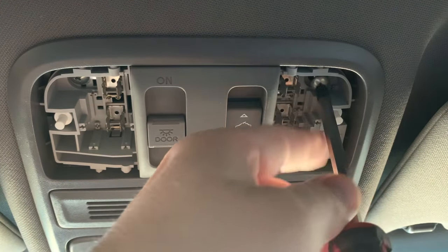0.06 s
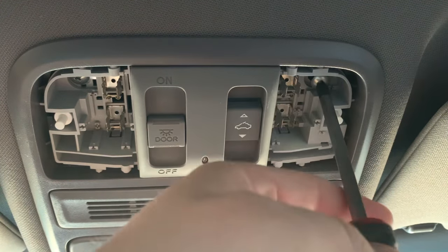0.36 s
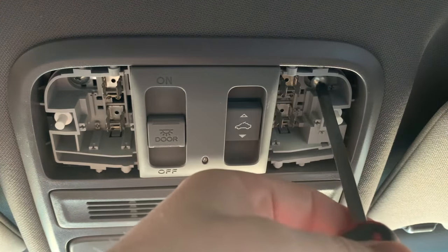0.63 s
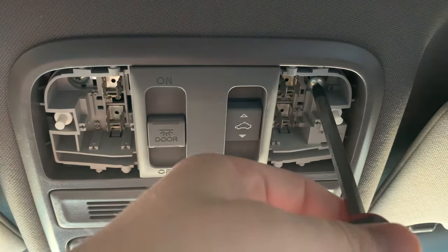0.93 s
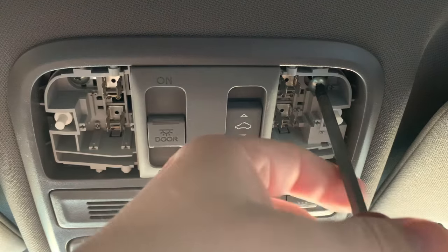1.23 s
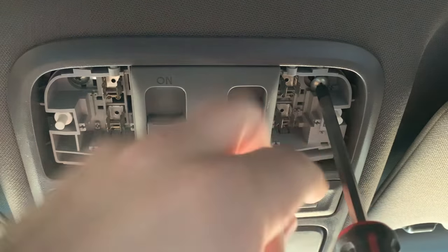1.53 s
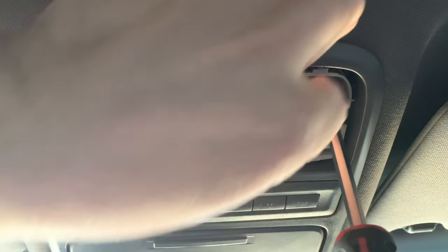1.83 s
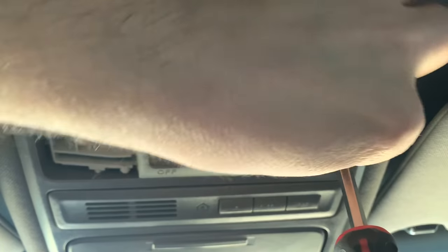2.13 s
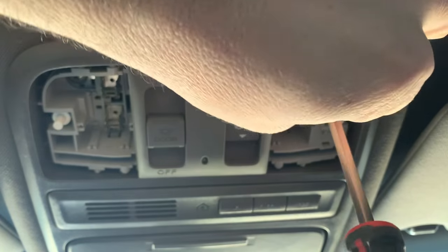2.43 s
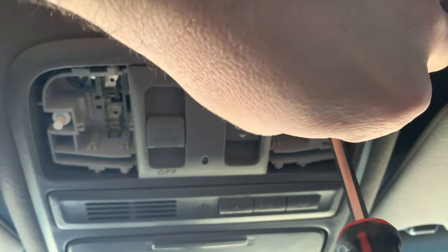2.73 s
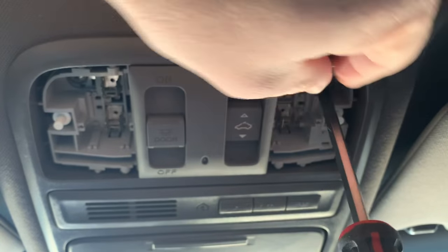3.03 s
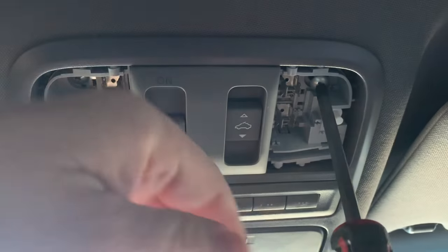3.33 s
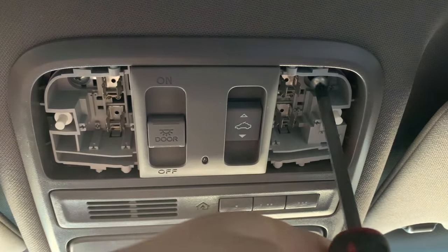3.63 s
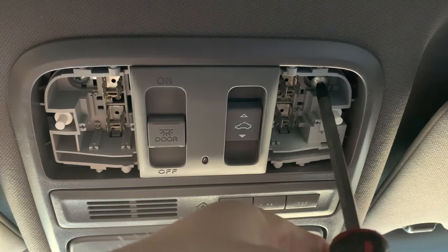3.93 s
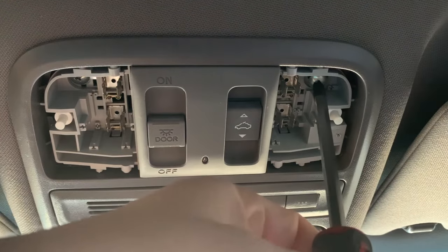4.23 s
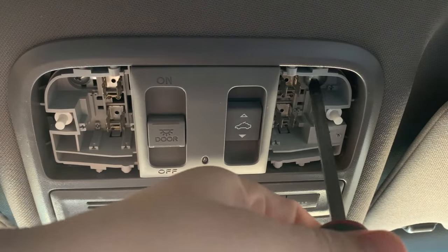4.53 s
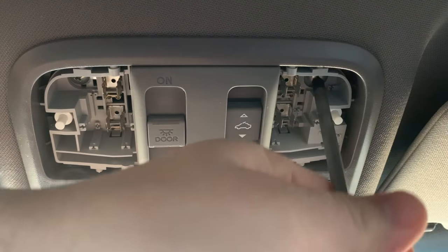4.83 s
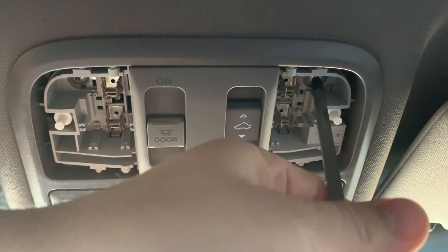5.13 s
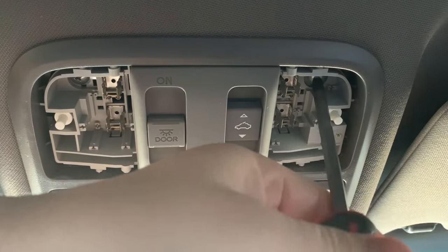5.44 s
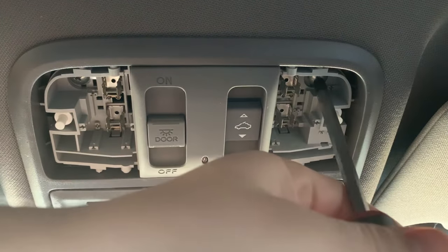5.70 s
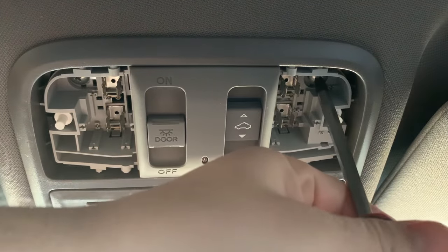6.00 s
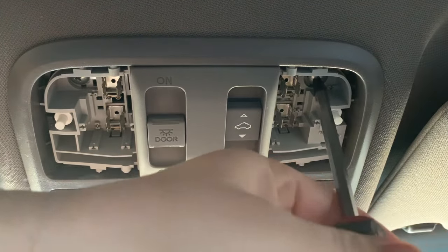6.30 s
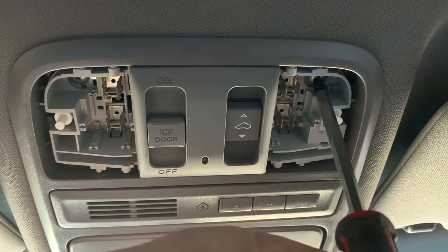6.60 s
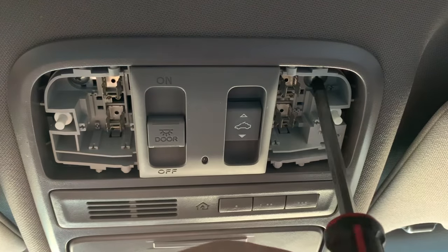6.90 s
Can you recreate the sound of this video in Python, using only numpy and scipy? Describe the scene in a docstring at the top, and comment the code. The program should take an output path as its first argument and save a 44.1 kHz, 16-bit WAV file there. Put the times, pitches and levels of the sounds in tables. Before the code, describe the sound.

A screwdriver turns a small screw in the plastic roof console of a parked car, heard close up. Light, scattered clicks and hollow knocks come with faint creaks and a brief squeaky scrape of the thread. A little past halfway the tip slips twice with sharp, louder snaps. Lighter knocks follow as fingers slide softly on the handle, over the low hush of the cabin.

```python
"""A screwdriver turns a small screw in the plastic roof console of a parked car, close by in the quiet cabin.
First the steel shaft rings faintly and the roof lining rumbles under the pushing hand. The bit (the tip)
starts to shift in the screw head and knock the housing; fingers slide round the tool, the thread scrapes
and an arm brushes past. These sounds come and go until the bit slips hard twice, near 4.5 and 4.8 seconds.
Then the work goes on, with lighter knocks and more sliding of the fingers."""
import sys
import numpy as np
from scipy import signal
from scipy.fft import rfft, irfft
from scipy.io import wavfile

SR = 44100
rng = np.random.default_rng(int(sys.argv[2]) if len(sys.argv) > 2 else 0)


def bounce(signal):
    """Save signal as a 16-bit WAV file at the path given by the first command-line argument."""
    frames = np.transpose(np.atleast_2d(signal))
    limited = np.clip(frames, -1, 1)
    pcm = np.round(limited * 32767).astype(np.int16)
    wavfile.write(sys.argv[1], SR, pcm)


N = 315756
TIME = np.arange(N) / SR
BIN_HZ = np.arange(N // 2 + 1) * SR / N   # the frequencies of a spectrum

# Levels are relative: the functions add their own gain. A ring time (t60) is the time to fade by 60 dB.
# the hush of the cabin: (frequency [Hz], level [dB])
CABIN_COLOUR = [(20, 0), (58, 0), (85, -9), (123, -1.5), (172, -15), (234, -13), (400, -25.5), (700, -31.5),
                (2000, -36), (6000, -41), (10000, -38), (16000, -41.5)]
# the notes (modes) of the steel shaft: (frequency [Hz], level [dB], ring time [s])
SHAFT_MODES = [(444.6, -3, 0.98), (905, -13, 0.37), (4660, -2, 0.31), (5740, -6.5, 0.14)]
# the notes of the post that holds the screw: (frequency [Hz], level [dB], ring time [s])
POST_MODES = [(1176, -4, 0.063), (1256, 1.5, 0.075), (1340, -7, .075), (2400, -10.5, 0.043)]
# the steel bears on the screw: (time [s], shaft bending [dB], shaft chime [dB], post [dB])
TOUCHES = [(.001, -74.5, -70, -78), (2.027, -79, -67, -45.5), (2.955, -54.5, -71, -64),
           (4.34, -74.5, -89.5, -53), (4.472, -55, -63.5, -26)]
# the hand pushes on the console: (time [s], hold [s], rumble [dB], creak [dB])
PUSHES = [(.01, 0.0044, -59.5, -62), (0.201, 0.0089, -71, -73), (0.447, 0.085, -54.5, -54.5),
          (0.759, 0.056, -52, -48), (1.313, 0.11, -59.5, -61.5), (1.46, 0.12, -52.5, -55),
          (2.058, 0.25, -55.5, -55), (2.28, 0.099, -54.5, -64), (2.609, 0.019, -51.5, -54.5),
          (2.789, 0.069, -54.5, -50), (2.94, 0.041, -56, -56), (3.089, 0.065, -55.5, -57),
          (3.242, 0.056, -54.5, -54.5), (3.329, 0.14, -58, -64), (3.652, 0.17, -58.5, -58),
          (3.809, 0.046, -46.5, -51.5), (4.08, 0.15, -49.5, -50.5), (4.34, 0.063, -50, -51.5),
          (4.891, 0.061, -58, -59.5), (5.031, 0.02, -60.5, -59), (5.28, 0.17, -60.5, -56),
          (5.539, 0.066, -59.5, -59), (5.73, 0.14, -63, -60), (5.897, 0.024, -50, -48.5),
          (6.031, 0.028, -50, -52.5), (6.18, 0.035, -47, -56.5), (6.27, 0.071, -54, -50.5),
          (6.452, 0.11, -63.5, -53.5), (6.6, 0.059, -53, -68), (6.722, 0.19, -61.5, -62.5),
          (6.953, 0.024, -53.5, -52.5), (7.09, 0.076, -54, -53.5)]
# the rumbling roof lining: (frequency [Hz], level [dB])
RUMBLE_COLOUR = [(20, -9), (35, 3.5), (60, 1), (90, 0.5), (122, 2), (160, -11), (230, -20.5), (400, -48)]
# the creaking plastic: (frequency [Hz], level [dB])
CREAK_COLOUR = [(120, -28), (190, -8.5), (230, 5), (275, -2.5), (345, -3), (400, -24), (460, -11),
                (560, -23.5), (800, -25), (1300, -34.5), (2500, -53)]
# the bit shifts or slips: (time [s], housing knock [dB], lining thud [dB],
# treble lost in the first octave [dB], contact time [ms], tock pitch [Hz], tock level [dB])
KNOCKS = [(.203, -72, -74, 23, 1.9, 270, -58.5), (.327, -54, -71, 16.5, 2.5, 320, -43.5),
          (0.356, -59, -72, 20, 2.2, 346, -52), (.420, -48, -54, 13, 0.64, 289, -44.5),
          (.462, -58, -46, 4.5, 0.44, 250, -54), (.724, -55.5, -63, 1, 0.28, 593, -49.5),
          (.742, -49, -52.5, 3.5, 0.72, 550, -46), (.779, -50, -48, 7, 0.64, 710, -49),
          (.786, -54, -68, 1, 0.93, 1040, -48), (.817, -54.5, -53, 6, 0.14, 490, -55),
          (.906, -56, -52, 3.5, 0.69, 390, -72), (1.447, -51, -50, 4, 0.98, 436, -49),
          (1.524, -67.5, -75, 1, 0.28, 615, -64), (1.543, -65.5, -52, 2.5, 0.22, 500, -64),
          (2.293, -65, -49, -0.5, .8, 510, -54), (2.557, -45.5, -52, 2.03, 0.034, 594, -38.5),
          (2.590, -60.5, -43.5, 3, 0.17, 230, -42), (2.810, -47.5, -62, -1.5, 1.33, 990, -45.5),
          (2.816, -57, -48, 18, 1.9, 277, -45), (3.626, -63, -72, 3, 1, 292, -66),
          (3.689, -62, -59, 11, 1.1, 510, -62), (3.789, -56, -61.5, 2, 0.76, 680, -60),
          (3.803, -45.5, -55, 16, 3.1, 255, -41.5), (3.825, -56, -57, 14, 2.7, 270, -44),
          (4.109, -45.5, -48.5, 6.5, 0.46, 253, -35.5), (4.133, -49, -56, 21, 1.5, 268, -49),
          (4.341, -45.5, -62, 2.5, 0.78, 342, -44), (4.4645, -33, -52, 0.8, .09, 477, -36),
          (4.4712, -26, -27, 0.4, .062, 251, -21), (4.488, -25, -27.5, 8, .3, 221.4, -23),
          (4.774, -37.5, -46, 0.33, 0.13, 558, -32), (4.786, -30.5, -45, 14, 1.2, 243, -21),
          (5.265, -60, -68, 12.5, 1.5, 310, -56), (5.745, -63.5, -72.5, 9.5, 1.2, 330, -62),
          (5.894, -53.5, -45.5, 1.5, .9, 273, -42), (6.014, -48, -55.5, 5.5, 0.81, 378, -51),
          (6.131, -56, -68, 3, 0.33, 405, -48), (6.436, -51.5, -55.5, 30, 2, 237, -45.5),
          (6.522, -53, -81, 3, .9, 380, -53.5), (6.656, -52, -59, 15, 2.5, 280, -45),
          (6.665, -47, -61.5, 2, 0.61, 328, -45), (6.863, -47.5, -87, 3, 0.58, 434, -39.5),
          (6.955, -60.5, -65.5, 1.5, 0.33, 297, -60), (7.083, -59.5, -67, 5.5, .7, 279, -55.5)]
# the notes of the struck patch of plastic: (multiple of the tock pitch [ratio], level [dB])
PATCH_MODES = [(1, 2), (1.37, -4.5), (1.83, -10), (2.6, -15)]
# the notes of console and roof lining: (frequency [Hz], level [dB], ring time [s])
CONSOLE_MODES = [(71.2, -1.5, 0.27), (127.8, 5, 0.18), (171.5, -0.5, 0.2), (234.6, 10, 0.1),
                 (265.9, 3.5, 0.1), (340.6, -5, .12), (453, -10, 0.11), (510, -5, 0.057),
                 (634, -13.5, 0.082), (737, -8, 0.091), (1083, -13.5, 0.09), (1700, -13, 0.086),
                 (2143, -3.5, 0.074), (2306, -7.5, 0.09), (3610, -10, 0.07), (3750, -9.5, 0.028),
                 (4100, -9.5, .06), (4860, -0.5, 0.036), (4990, -1, .036), (5380, -5, 0.04),
                 (6070, -9.5, .045)]
# the wash of weaker notes and echoes: (frequency [Hz], level per half octave [dB])
WASH_COLOUR = [(45, -16.5), (130, -5.5), (280, -5), (550, -8.5), (900, -13), (1300, -4.5), (2400, -11),
               (3400, -10), (5000, -3), (9000, -1.5), (15000, -15.5)]
# how long that wash lasts: (frequency [Hz], ring time [s])
WASH_T60 = [(60, 0.701), (250, 0.22), (600, 0.11), (1500, 0.12), (4000, 0.1), (9000, 0.05), (15000, 0.085)]
# fingers slide round the tool: (time [s], hold [s], level [dB], brightness [dB])
STROKES = [(.37, .12, -77.5, 1.5), (0.699, 0.06, -73.5, -1), (.912, 0.016, -73.5, 3),
           (1.533, 0.003, -66, 1.5), (1.959, 0.039, -69.5, -5), (2.10, 0.041, -70, -7),
           (2.385, 0.034, -68.5, -2), (2.939, 0.045, -73, -9), (3.091, 0.011, -67, 3.5),
           (3.628, 0.014, -68, 2.5), (3.84, 0.033, -66, 1), (4.078, 0.051, -67.5, 0),
           (4.145, 0.073, -62, 0.5), (4.274, 0.018, -64.5, 1.5), (4.382, 0.023, -68, 3.5),
           (4.515, 0.024, -60, 3.5), (4.902, 0.025, -69, -1.5), (5.01, 0.015, -74.5, -1),
           (5.104, 0.019, -64, 2), (5.294, 0.12, -62, 2), (5.527, 0.068, -60.5, 2),
           (5.753, 0.092, -61, 2.5), (6.001, 0.041, -59, 3.5), (6.215, 0.03, -54.5, 1.5),
           (6.25, 0.047, -61, 0), (6.31, 0.054, -72.5, 1), (6.463, 0.074, -71, -1),
           (6.547, 0.027, -62.5, 1.5), (6.656, 0.027, -60.5, 2.5), (6.749, 0.1, -66.5, -1),
           (6.96, 0.2, -73.5, 1), (7.136, 0.067, -59, 1)]
# skin sliding on the handle: (frequency [Hz], level [dB])
SLIDE_COLOUR = [(500, -23), (900, -11), (1170, -3.5), (1500, -5), (2250, -0.5), (3000, -6), (4400, -1.5),
                (6800, -1), (9000, 1), (11500, -3), (14000, 3), (16000, -0.5)]
# the thread scrapes in the plastic: (time [s], hold [s], rasp [dB], squeal [dB], squeal pitch [Hz])
SCRAPES = [(.44, 0.26, -77.5, -86, 1250), (.73, 0.043, -66, -71, 1290), (1.66, 0.029, -97, -82.5, 1350),
           (1.954, 0.062, -65.5, -72, 1370), (2.028, 0.015, -51, -57, 1310), (2.075, 0.041, -59, -72, 1190),
           (2.125, 0.043, -53, -62, 1415), (2.32, 0.016, -69, -91, 1290), (2.52, 0.065, -74, -83, 1310),
           (2.76, 0.31, -71.5, -95, 1150), (2.954, 0.029, -58.5, -59.5, 1190),
           (4.08, 0.043, -74, -69.5, 1245), (4.18, .11, -71, -75, 1284), (6.28, 0.069, -77, -73.5, 1150)]
# the pitches that stand out in the rasp: (frequency [Hz], width [Hz], level [dB])
SCRAPE_MODES = [(480, 180, -4), (796, 60, -4), (1152, 70, 0.5), (1379, 63, -1.5), (1580, 167, -9),
                (2150, 25, -5.5), (2300, 40, -4.5), (2590, 60, -9.5), (4620, 140, -14.5),
                (7500, 890, -21.5)]
# the arm brushes past: (time [s], hold [s], level [dB], squeak start [Hz], squeak end [Hz])
BRUSHES = [(0.469, 0.1, -79, 4300, 4900), (.695, 0.067, -77, 4550, 4700), (1.961, 0.062, -74.5, 4860, 4600),
           (2.07, 0.084, -67, 4920, 4260), (2.372, 0.04, -73.5, 4140, 4500), (2.699, 0.17, -75, 6200, 5700),
           (2.87, 0.058, -70, 4400, 5150), (2.935, .045, -63.5, 8240, 8100),
           (3.001, 0.086, -67.5, 5900, 5860), (3.13, 0.15, -74.5, 4220, 4000),
           (3.30, 0.097, -78, 4900, 4440), (3.83, 0.11, -75, 4430, 4000), (4.39, 0.02, -72.5, 4800, 4770),
           (6.187, 0.048, -67.5, 4900, 4580), (6.44, 0.055, -75, 4900, 4600)]
# the brushing arm: (frequency [Hz], level [dB])
BRUSH_COLOUR = [(400, 14), (1000, 0), (2200, 5), (3600, 5), (5200, 1), (7000, -5.5), (10000, -4.5),
                (15000, -72.5)]
# how alike left and right are: (frequency [Hz], likeness [1 the same, -1 opposite])
LIKENESS = [(60, 0.96), (250, 0.92), (420, 0.51), (700, 0.13), (1300, 0.12), (2500, -0.19), (5000, 0.18),
            (7200, -0.74), (8400, 0.9), (10400, 0.2), (11200, -1.15), (12000, -0.98), (12900, 0.12),
            (15000, 0.26)]
# which side is louder: (frequency [Hz], left minus right [dB])
PAN = [(110, -0.9), (350, -0.5), (700, 2.5), (1300, 2.5), (2400, 1), (4400, -2.5), (8000, 0), (15000, 0)]

FLAT_COLOUR = [(1, 0), (SR, 0)]   # even noise: (frequency [Hz], level [dB])
RIPPLE_DB = rng.normal(0, 6.6, (2, 1000))   # chance peaks and dips from crowded panel notes and echoes
THUD_HZ, KNOCK_HZ, CRACK_HZ = 114, 266, 7000   # where lining, housing and steel sound
SOFTNESS_HZ, SOFTNESS_BEND = 374, 1.23   # where a knock's treble loss starts, and how it steepens


def from_db(db):
    """Turn decibels into a gain."""
    return 10 ** (np.asarray(db) / 20)


def rms_one(x):
    """Scale a signal to an average power of 1."""
    return x / np.sqrt(np.mean(x ** 2) + 1e-20)


def at_hz(points, hz):
    """Read between a table's rows, with octaves evenly spaced."""
    frequencies, values = np.transpose(points)
    return np.interp(np.log(np.maximum(hz, 1)), np.log(frequencies), values)


def drift(per_s):
    """A random wobble of typical size 1."""
    points = rng.standard_normal(int(N / SR * per_s) + 2)
    return rms_one(np.interp(TIME * per_s, np.arange(len(points)), points))


def band_pass(x, low_hz, high_hz):
    """Keep the sound between two frequencies."""
    return signal.sosfilt(signal.butter(2, [low_hz, high_hz], "band", fs=SR, output="sos"), x)


def ripple(spacing_hz):
    """The console's narrow peaks and dips in dB, weaker in the bass."""
    curves = np.array([np.interp(BIN_HZ / spacing_hz, np.arange(len(row)), row) for row in RIPPLE_DB])
    return curves * BIN_HZ / (BIN_HZ + 500)


def coloured(pair, colour, rippled):
    """Give two noises a tone colour and a share of the ripple, then blend them into left and right."""
    alike = np.clip(at_hz(LIKENESS, BIN_HZ), -1, 1)
    mid, side = rfft(pair) * from_db(at_hz(colour, BIN_HZ) + rippled * ripple(spacing_hz=58.5))
    return rms_one(irfft(np.sqrt(1 + alike) * mid + np.sqrt(1 - alike) * side * [[1], [-1]], N))


def friction(per_s, spread_db):
    """Rubbing surfaces make tiny slips of uneven size at random times."""
    sizes = from_db(spread_db * np.minimum(rng.exponential(1, (2, N)), 4))
    return (rng.random((2, N)) < per_s / SR) * sizes * rng.choice([-1, 1], (2, N))


def ring(clicks, hz, t60):
    """Each click starts a fading note: .imag is its sine wave; at 0 Hz, .real is just the fade."""
    step = from_db(-60 / (t60 * SR)) * np.exp(2j * np.pi * hz / SR)
    return signal.lfilter([1], [1, -step], clicks + 1e-18)


def gliding(x, hz, width_hz):
    """Pick a narrow band with a moving pitch out of a noise."""
    turn = np.exp(2j * np.pi * np.cumsum(hz) / SR)
    keep = np.exp(-np.pi * width_hz / SR)
    return rms_one((signal.lfilter([1], [1, -2 * keep, keep ** 2], x / turn) * turn).real)


def gestures(rows, attack_s, release_s, linger):
    """The loudness of movements that swell, hold and fade; longer ones start and stop more gently."""
    power = 1e-14
    for s, held_s, db in rows:
        before = np.maximum(s - TIME, 0) / (attack_s + linger * held_s)
        after = np.maximum(TIME - s - held_s, 0) / (release_s + linger * held_s)
        power = power + from_db(db - 20 * np.minimum(before + after, 10)) ** 2
    return np.sqrt(power)


def cabin(level_db):
    """A faint, low, steady hush fills the car."""
    return from_db(level_db) * coloured(rng.standard_normal((2, N)), CABIN_COLOUR, rippled=0.18)


def tool_rings(chime_above_hz):
    """A touch makes the steel shaft bend and chime; the screw post answers with a hollow ping."""
    s, bending_db, chime_db, post_db = np.transpose(TOUCHES)
    struck = [(mode, bending_db if mode[0] < chime_above_hz else chime_db) for mode in SHAFT_MODES]
    struck += [(mode, post_db) for mode in POST_MODES]
    out = np.zeros(N)
    for (hz, mode_db, t60), touch_db in struck:
        clicks = np.zeros(N)
        clicks[np.round(s * SR).astype(int)] = from_db(mode_db + touch_db)
        out += (ring(clicks, hz, t60) - ring(clicks, hz, 10 / hz)).imag   # the short ring softens the start
    return out


def pressure(creak_db, unsteady_db):
    """The lining rumbles under each push while the thread creaks through the plastic in soft slips."""
    load = gestures([row[:3] for row in PUSHES], attack_s=0.12, release_s=0.05, linger=0.54)
    creep = gestures([(s, held, db) for s, held, _, db in PUSHES],
                     attack_s=0.044, release_s=0.055, linger=0.33)
    rumble = coloured(rng.standard_normal((2, N)), RUMBLE_COLOUR, rippled=0.92)
    flutter = from_db(creak_db + unsteady_db * drift(25))
    creak = coloured(friction(per_s=910, spread_db=2.0), CREAK_COLOUR, rippled=0.33)
    return load * rumble + creep * flutter * creak


def blows(hz):
    """One click per knock, as strong as that knock is at this frequency; soft contacts lose treble."""
    s, knock_db, thud_db, softness_db, contact_ms, _, _ = np.transpose(KNOCKS)
    lining = np.interp(np.log(hz), np.log([THUD_HZ, KNOCK_HZ]), [1, 0])   # its share grows in the bass
    octaves = max(np.log2(hz / SOFTNESS_HZ), 0)
    level_db = lining * thud_db + (1 - lining) * knock_db - softness_db * octaves ** SOFTNESS_BEND
    cycles = hz * contact_ms / 1000   # vibrations quicker than the contact are barely set off
    clicks = np.zeros(N)
    clicks[np.round(s * SR).astype(int)] = from_db(level_db) / np.sqrt(1 + cycles ** 6)
    return clicks


def hiss_before_knock(level_db, swell_s, low_hz, high_hz):
    """A brief gritty hiss swells just before each knock, louder before a harder snap."""
    keep = np.exp(-1 / (swell_s * SR))
    swell = signal.lfilter([1], [1, -keep], blows(CRACK_HZ)[::-1] + 1e-18)[::-1]   # a fade run backwards
    grit = band_pass(friction(per_s=13000, spread_db=4.0), low_hz, high_hz)
    return from_db(level_db) * swell * rms_one(grit)


def crack(level_db, t60, rise_t60, low_hz, high_hz, tilt_db):
    """Steel snaps over steel in a short, bright burst; each band is tilt_db above the one below."""
    noise = coloured(rng.standard_normal((2, N)), FLAT_COLOUR, rippled=.5)
    out, edges = 0, np.geomspace(low_hz, high_hz, 5)
    for k, (low, high) in enumerate(zip(edges, edges[1:])):
        clicks = blows(np.sqrt(low * high))
        burst = (ring(clicks, 0, t60) - ring(clicks, 0, rise_t60)).real
        out += from_db(level_db + k * tilt_db) * burst * rms_one(band_pass(noise, low, high))
    return out


def tocks(level_db, ring_cycles, right_lag_s, rise_cycles, loss_db_per_ms):
    """The struck patch of plastic gives a short hollow tock, pitched by where the bit presses."""
    out = np.zeros((2, N + SR))
    age = np.maximum(np.arange(SR // 5) / SR - np.array([[0], [right_lag_s]]), 0)
    for s, *_, contact_ms, pitch_hz, tock_db in KNOCKS:
        start = round(s * SR)
        for multiple, mode_db in PATCH_MODES:
            cycles = pitch_hz * multiple * age
            loss_db = loss_db_per_ms * contact_ms * np.log2(multiple)   # a long contact sounds rounder
            fade = from_db(level_db + tock_db + mode_db - loss_db - 60 * cycles / ring_cycles)
            rise = (1 - np.exp(-cycles / rise_cycles)) ** 2
            out[:, start:start + age.shape[1]] += rise * fade * np.sin(2 * np.pi * cycles)
    return out[:, :N]


def console(level_db, swell_cycles, right_lag_s, uneven_db):
    """Each knock rings the console's notes; they take a few cycles to build, so low ones bloom late."""
    out = np.zeros((2, N))
    for hz, mode_db, t60 in CONSOLE_MODES:
        clicks = blows(hz)
        clicks[clicks > 0] *= from_db(uneven_db * rng.standard_normal(np.count_nonzero(clicks)))
        swing = ring(clicks, hz, t60) - ring(clicks, hz, min(swell_cycles / hz, t60 / 2))
        turn = np.exp(.5j * min(2 * np.pi * hz * right_lag_s, np.pi / 2))   # the left side leads
        out += from_db(level_db + mode_db) * np.array([(swing * turn).imag, (swing / turn).imag])
    return out


def wash(level_db, swell_cycles, swell_s, tail_db, tail_t60):
    """After a knock, crowded plastic notes and near echoes fade band by band over a faint cabin echo."""
    out, edges = 0, 2 ** np.arange(5.5, 14.1, .5)   # half octaves, 45 Hz to 16 kHz
    noises = [coloured(rng.standard_normal((2, N)), FLAT_COLOUR, rippled=1.0) for _ in range(2)]
    for k, (low, high) in enumerate(zip(edges, edges[1:])):
        hz = np.sqrt(low * high)
        energy = blows(hz) ** 2 + 1e-18
        early, late = [signal.lfilter([1], [1, -from_db(-120 / (t60 * SR))], energy)
                       for t60 in (at_hz(WASH_T60, hz), tail_t60)]
        keep = np.exp(-1 / ((swell_s + swell_cycles / hz) * SR))
        power = signal.lfilter([1 - keep], [1, -keep], early + from_db(tail_db) ** 2 * late)
        band = rms_one(band_pass(noises[k % 2], low, high))
        out += band * np.sqrt(power) * from_db(level_db + at_hz(WASH_COLOUR, hz))
    return out


def fingers(level_db, hiss_above_hz, wander_db, wander_per_s):
    """Dry skin catches on the handle: a fingertip (bright) hisses, the flat of the hand (dull) rasps."""
    rasp, hiss = [gestures([(s, held, db + sign * bright) for s, held, db, bright in STROKES],
                           attack_s=0.014, release_s=0.04, linger=0.14) for sign in (-1, 1)]
    grit = rfft(coloured(friction(per_s=3600, spread_db=4.0), SLIDE_COLOUR, rippled=0.94))
    out, centres_hz = 0, np.linspace(1000, 15000, 10)
    for hz, share in zip(centres_hz, np.eye(len(centres_hz))):
        hiss_share = 1 / (1 + (hiss_above_hz / hz) ** 10)
        band = irfft(grit * np.interp(BIN_HZ, centres_hz, share), N)
        wander = from_db(wander_db * drift(wander_per_s))   # the colour shifts as the grip rolls
        out += band * (rasp * (1 - hiss_share) + hiss * hiss_share) * wander
    return out * from_db(level_db)


def thread(flutter_db, squeal_db, squeal_width_hz, waver_hz):
    """Tiny slips of the thread make the screw post rasp; where it binds, a narrow gliding squeal rises out of
    the same slips."""
    turning, binding = [gestures([(row[0], row[1], row[column]) for row in SCRAPES],
                                 attack_s=0.0079, release_s=0.043, linger=0.12) for column in (2, 3)]
    bins = BIN_HZ[1:]
    power = sum(from_db(db) ** 2 / (1 + (hz / width * (bins / hz - hz / bins)) ** 2)
                for hz, width, db in SCRAPE_MODES)
    post_colour = np.column_stack([bins, 10 * np.log10(power)])
    slips = friction(per_s=2100, spread_db=1.5)
    rasp = turning * from_db(flutter_db * drift(80)) * coloured(slips, post_colour, rippled=0.64)
    path = sorted((s + offset, hz) for s, held_s, _, _, hz in SCRAPES for offset in (0, held_s))
    pitch_hz = np.interp(TIME, *np.transpose(path)) + waver_hz * drift(30)
    return rasp + from_db(squeal_db) * binding * gliding(slips, pitch_hz, squeal_width_hz)


def arm(level_db, flutter_db, squeak_db, squeak_width_hz, waver_hz):
    """The arm brushes past as the grip changes; skin on plastic adds a gliding squeak."""
    grains = coloured(friction(per_s=2300, spread_db=0.5), BRUSH_COLOUR, rippled=0.24)
    path = sorted(point for s, held_s, _, start_hz, end_hz in BRUSHES
                  for point in ((s, start_hz), (s + held_s, end_hz)))
    pitch_hz = np.interp(TIME, *np.transpose(path)) + waver_hz * drift(30)
    squeak = gliding(grains, pitch_hz, squeak_width_hz)
    passes = gestures([row[:3] for row in BRUSHES], attack_s=0.0079, release_s=0.026, linger=0.38)
    flutter = from_db(flutter_db * drift(65))
    return passes * flutter * (from_db(level_db) * grains + from_db(squeak_db) * squeak)


def scene():
    """Mix knocks, tool and hands, balance them left and right, and add the cabin's hush."""
    knocks = console(level_db=4.0, swell_cycles=10.0, right_lag_s=0.00025, uneven_db=2.5)
    knocks += tocks(level_db=2.5, ring_cycles=18, right_lag_s=0.00016, rise_cycles=.55, loss_db_per_ms=8)
    knocks += wash(level_db=0.5, swell_cycles=0.79, swell_s=0.0019, tail_db=-30.5, tail_t60=0.38)
    knocks += crack(level_db=16.0, t60=0.0082, rise_t60=0.004, low_hz=4160, high_hz=12100, tilt_db=1.2)
    knocks += hiss_before_knock(level_db=-7.0, swell_s=0.0057, low_hz=500, high_hz=7450)
    scraping = thread(flutter_db=2.0, squeal_db=1.0, squeal_width_hz=110, waver_hz=25)
    tool = tool_rings(chime_above_hz=1500) + scraping
    hands = fingers(level_db=2.5, hiss_above_hz=7900, wander_db=3.0, wander_per_s=19.0)
    hands += arm(level_db=3.5, flutter_db=1.14, squeak_db=-6.0, squeak_width_hz=1200, waver_hz=108.6)
    hands += pressure(creak_db=-3.0, unsteady_db=2.5)
    balance = from_db(at_hz(PAN, BIN_HZ) * [[.5], [-.5]])
    return irfft(rfft(knocks + tool + hands) * balance, N) + cabin(level_db=-64.5)


def record(dry):
    """Cut away the highest treble, above 15900 Hz."""
    return signal.sosfilt(signal.ellip(10, .2, 70, 15900, fs=SR, output="sos"), dry)


dry = scene()
out = record(dry)
bounce(out)
```